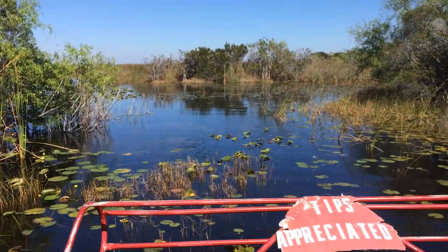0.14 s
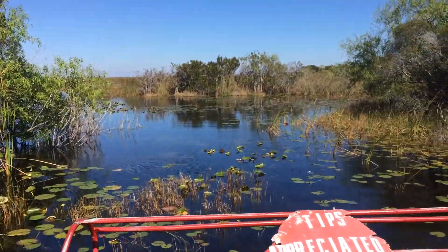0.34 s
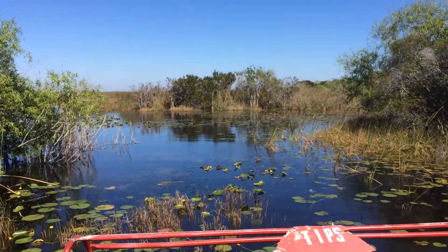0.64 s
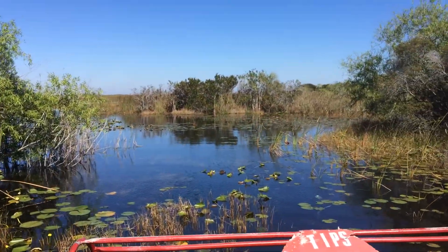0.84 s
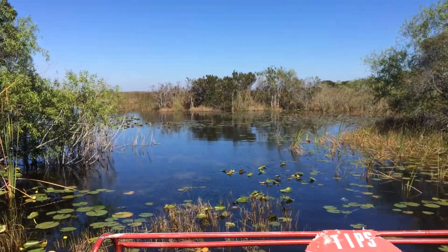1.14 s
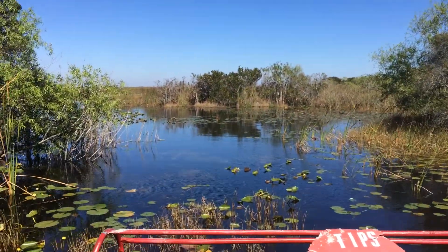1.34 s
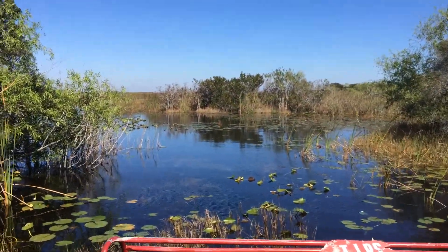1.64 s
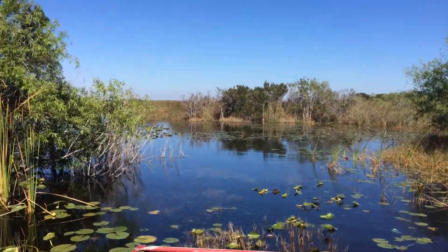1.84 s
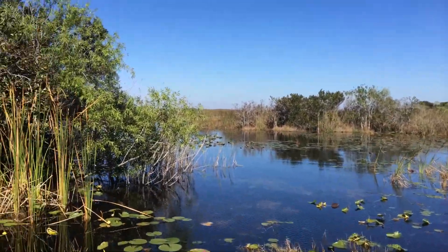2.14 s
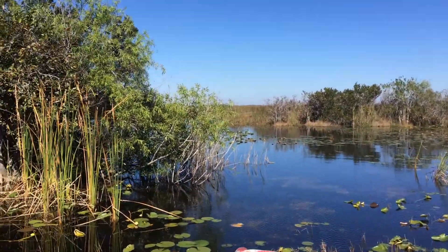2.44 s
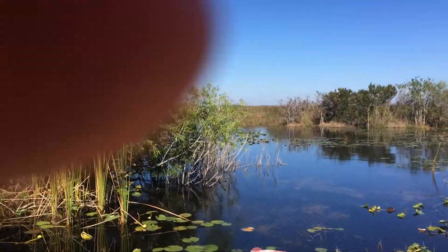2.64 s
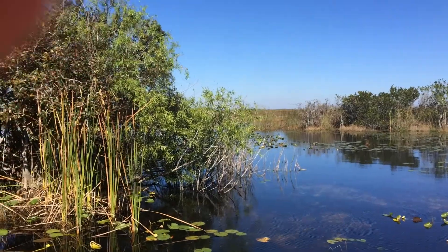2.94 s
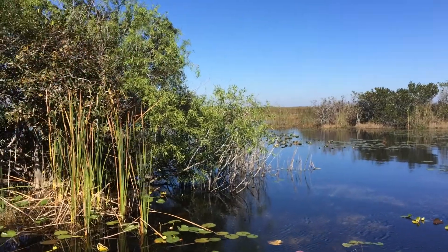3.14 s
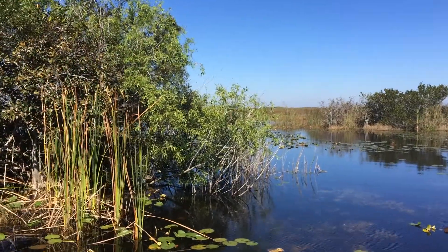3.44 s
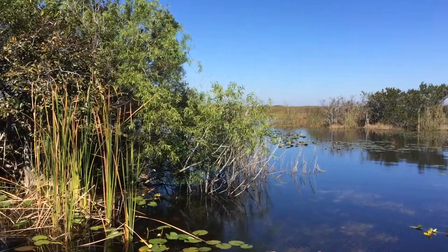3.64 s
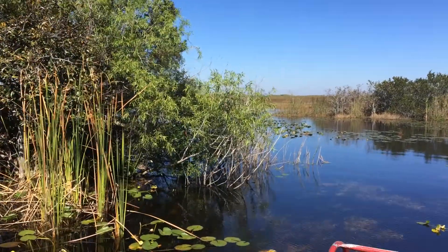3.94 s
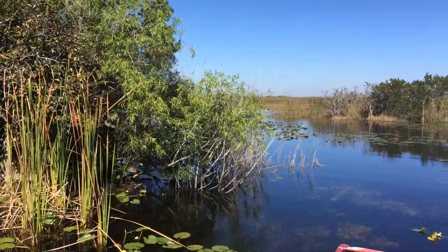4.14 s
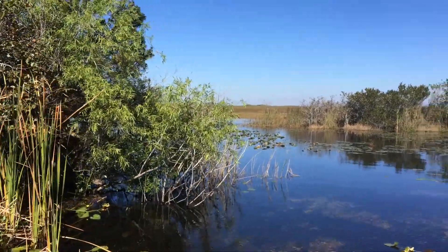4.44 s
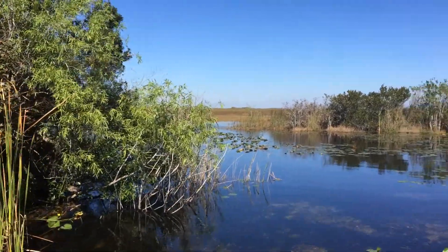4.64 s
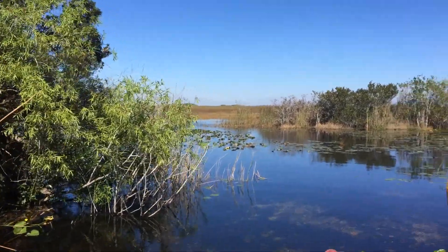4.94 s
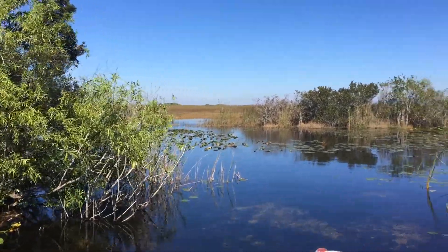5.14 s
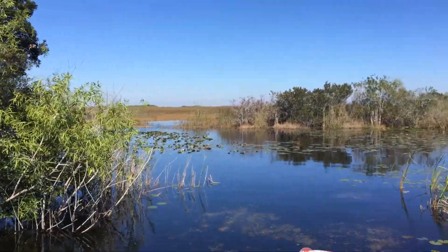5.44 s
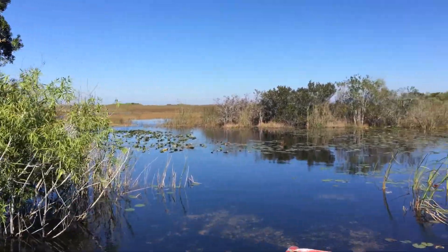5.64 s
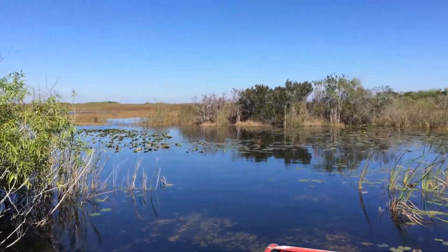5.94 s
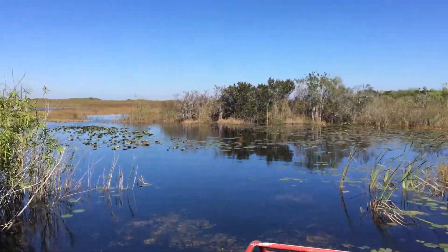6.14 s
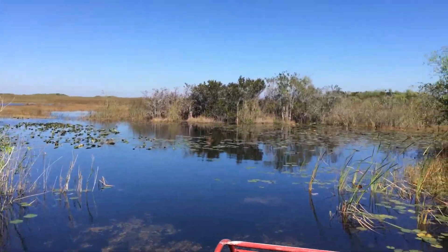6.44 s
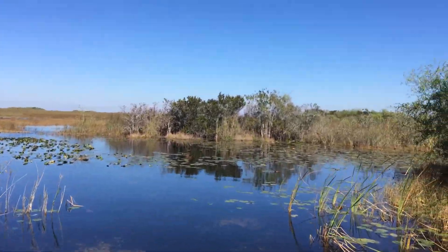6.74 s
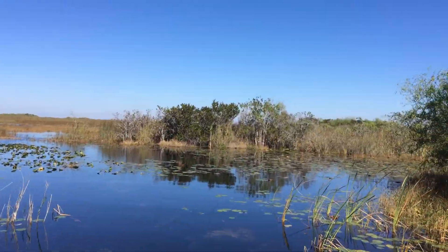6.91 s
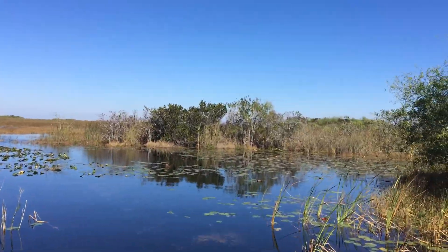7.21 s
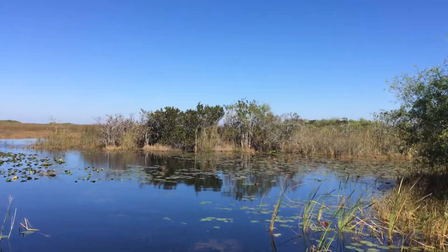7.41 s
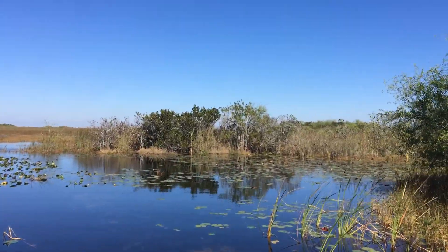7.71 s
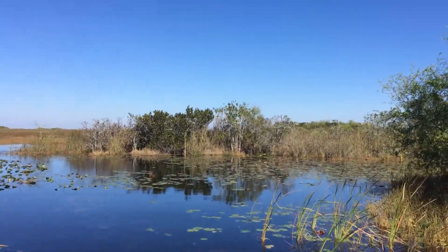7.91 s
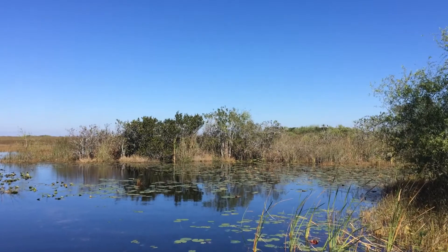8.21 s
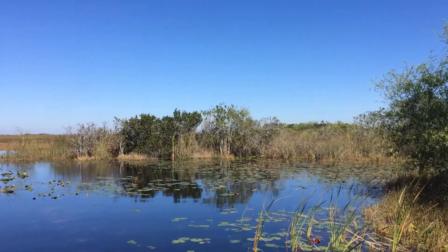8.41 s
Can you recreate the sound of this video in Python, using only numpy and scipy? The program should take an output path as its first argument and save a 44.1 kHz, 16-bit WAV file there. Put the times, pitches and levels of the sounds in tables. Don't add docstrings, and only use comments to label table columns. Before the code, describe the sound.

A big engine and propeller close by, outdoors with no echo. First a lumpy, low idle with clattering metal, almost sagging near one second. Then a quick rev into a strong throbbing roar with hard exhaust pops and rattling buzz, peaking past three seconds. The revs sink by six seconds, then rise slightly, droning on with airy hiss, spray-like swishes and loose knocks. Mono, close, light on sub-bass.

```python
import sys
import numpy as np
from scipy import signal
from scipy.fft import rfft, irfft, next_fast_len
from scipy.io import wavfile
from scipy.ndimage import uniform_filter1d

SR = 44100
rng = np.random.default_rng(int(sys.argv[2]) if len(sys.argv) > 2 else 0)


def elevation(decibels):
    levels = np.asarray(decibels, float)
    return 10 ** (levels / 20)


def dump(signal):
    limited = np.clip(np.atleast_2d(signal).T, -1, 1)
    pcm = np.round(limited * 32767).astype(np.int16)
    wavfile.write(sys.argv[1], SR, pcm)


N = 377937

# t/s, speed/(turns per s)
SHAFT_SPEED = [(0, 15.64), (.48, 16.38), (1.22, 13.71), (2.04, 14.43), (2.36, 20.15), (2.68, 21.8),
               (2.95, 28.0), (3.2, 30.78), (3.4, 31.36), (3.7, 30.24), (4.05, 30.41), (4.6, 27.69),
               (5.95, 21.44), (6.8, 21.76), (7.14, 24.32), (7.48, 24.39), (7.99, 26.12), (8.57, 25.04)]
# t/s, engine load/dB, shaking of the cage/dB
ENGINE_LOAD = [(0, 0, -3), (.55, -2.5, -39), (1.0, -22.5, -2), (1.3, -5.5, -4), (2.0, -19.5, -3),
               (2.25, 3, -14), (2.6, 2.5, 9), (2.85, 4, 15.5), (3.4, 5, 13), (3.8, 5.5, 14.5), (4.5, 4, 6),
               (5.0, 3, 9.5), (5.9, 1, 4.5), (6.5, 0, 6.5), (6.9, 4, 2), (7.4, 2.5, 6), (8.0, 4.5, -5),
               (8.57, 4.5, -1)]
# t/s, change of orders 2 and 4/dB, change of orders 5, 6 and 7/dB
ORDER_SWELLS = [(0, 0.1, 0.1), (2.5, 0.1, 0.1), (2.78, 1.5, 0.1), (3.0, -1.5, 0.6), (3.3, 0.1, 0.6),
                (3.65, -1.5, 3.2), (3.95, -2.2, 1.5), (4.45, 2.8, 2.5), (4.92, 3.2, 0.8), (5.3, -0.6, -2.5),
                (5.8, -0.6, 0.1), (6.2, 2.2, -1.5), (6.5, -0.6, 0.1), (6.9, 2.5, 2.2), (7.2, -1.5, 1.2),
                (7.6, -1.2, 2.2), (8.0, -1.8, 2.5), (8.57, 0.6, 1.5)]

ORDER_LEVELS = [-26.5, -31, -34.5, -36.5]
ORDER_LOAD_SHARE = [0, 1, 1, 1]
ORDER_SURGE = [.42, .3, 0, -.3]
# f/Hz, lift/dB
HULL_LIFT = [(28, -20), (40, -1), (44, 5), (51, 6), (62, 3), (86, -4), (102, 1.8), (122, 3.5), (134, -2),
             (150, 7.5), (185, 7.5)]

FIRING_DIFFERENCE = [-1.5, -8, -4, -4.5]
# f/Hz, level/dB per Hz
RUMBLE_SPECTRUM = [(8.8, -58), (15, -28), (27, -13), (40, 1), (58, -2), (76, -4), (106, -5), (140, -3),
                   (160, -2), (195, -14.5), (313, -33.5), (381, -44), (420, -27), (550, -64), (920, -120)]
# f/Hz, width/Hz, level/dB
PIPE_MODES = [(186, 60, 13), (331.6, 108, 4), (458, 83, -1), (631, 104, -1.5), (1000, 170, -12)]
# t/s, peak level/dB, f/Hz
HARD_POPS = [(2.288, -23, 580), (2.412, -24, 635), (2.969, -24, 536), (3.001, -32, 592), (3.038, -22, 590),
             (3.07, -26, 630), (3.104, -31, 590), (3.172, -32, 554), (3.207, -24, 535), (3.236, -17.5, 540),
             (3.272, -22, 442), (3.3, -27, 604), (3.333, -22, 470), (3.428, -28, 662), (3.465, -28, 730),
             (3.529, -23, 466), (3.593, -33, 614), (3.694, -24, 605), (3.79, -17.5, 600), (3.825, -15, 567),
             (3.889, -24, 530), (3.922, -35, 458), (3.988, -28, 576), (4.121, -36, 565), (4.15, -31, 533),
             (4.221, -23.5, 616), (4.327, -27, 615), (4.467, -24.5, 625), (4.529, -21, 552),
             (4.57, -22, 550), (4.978, -27, 608), (5.054, -24.5, 450)]

# f/Hz, level/dB per Hz
BLADE_HISS = [(180, 2), (300, 3), (403, -10.5), (578, -1.5), (803, -9), (1290, -12.5), (1770, -14),
              (2450, -18.5), (3880, -19), (11300, -28), (15200, -34.5)]
# f/Hz, level/dB per Hz
TIP_HISS = [(6000, -27), (9500, -3), (12000, 0.5), (15200, -3)]

# f/Hz, width/Hz, level/dB
CAGE_MODES = [(1180, 47, 13.5), (1480, 80, 11.5), (1654, 31, 13.5), (1790, 44, 16.5), (2476, 230, 0.5),
              (3140, 64, -20), (3340, 91, 1.5), (3960, 65, 6), (4220, 140, -4), (4870, 160, 1),
              (5560, 79, -28)]
# f/Hz, level/dB per Hz
CLASH_SPECTRUM = [(470, 2.5), (800, 9), (1180, -30), (1440, 11.5), (1690, -37), (1930, 7.5), (2270, -0.5),
                  (2530, -0.5), (3160, -0.5), (4290, -2.5), (7000, -7.5), (15000, -28)]
# t/s, peak level/dB, low ring f/Hz, high ring f/Hz, high ring level over the peak/dB
KNOCKS_AT_IDLE = [(0.119, -30.5, 1000, 4100, 5), (0.2973, -32, 1360, 3150, -18),
                  (0.6205, -23.5, 1520, 3400, 0), (0.7243, -29.5, 1310, 3880, 5),
                  (0.7945, -22.5, 1480, 4240, -13), (0.865, -29, 1770, 4870, 4),
                  (0.9043, -25.5, 1000, 3230, -2), (1.0518, -31, 1560, 3100, 0),
                  (1.2154, -24, 1880, 3870, -14), (1.2506, -21, 2520, 2990, 0),
                  (1.291, -37.5, 1800, 4500, 16), (1.3633, -29, 1950, 3090, -8),
                  (1.473, -30, 1780, 3860, 10), (1.508, -23, 1190, 4400, -3),
                  (1.6123, -19.5, 2540, 3330, -2), (1.802, -24, 2500, 4030, 7.5),
                  (1.8386, -23.5, 1650, 3780, -4), (1.9612, -30.5, 1830, 2920, -11),
                  (2.1528, -22.5, 1225, 2980, -24), (2.2215, -27.5, 1290, 4630, 11),
                  (2.2552, -23.5, 1790, 2960, 0), (2.2842, -18.5, 1180, 3580, -13),
                  (2.363, -21, 2395, 4380, 4), (2.4173, -28.5, 2640, 4540, 12),
                  (2.5153, -23.5, 1200, 2990, -18), (2.5634, -22.5, 1700, 4350, 2),
                  (2.7013, -28.5, 1130, 3640, 1), (2.7275, -23.5, 1860, 4470, -10),
                  (2.7447, -23.5, 1720, 4080, 0), (2.8032, -25, 1180, 3640, -14),
                  (2.8434, -25, 1200, 2970, -23), (2.8997, -25, 1000, 3540, -6)]
KNOCKS_UNDER_WAY = [(3.2574, -26.5, 1050, 3360, -8), (3.7404, -30, 1160, 3630, -8),
                    (3.825, -41, 1160, 4070, -4), (4.0894, -33, 1540, 3530, -4),
                    (4.4097, -32, 1000, 4220, 3), (4.8833, -28.5, 1790, 3440, -14),
                    (4.998, -29, 1100, 4360, 0), (5.2604, -41, 1780, 3130, -12),
                    (5.4262, -30, 1720, 3950, -11), (5.6222, -27, 1510, 3380, -15),
                    (5.7711, -29, 2610, 3640, 10.5), (6.0235, -29, 1480, 4400, 9),
                    (6.139, -23.5, 1740, 4220, 3), (6.3228, -29, 1670, 4340, 7),
                    (6.5837, -31, 1530, 4150, 7), (6.61, -41, 1630, 3470, -9),
                    (6.6812, -42, 1790, 3120, -4), (6.7052, -24.5, 1630, 3140, -9),
                    (6.7516, -30, 1810, 3760, 4), (6.818, -24.5, 1820, 3740, -16),
                    (6.8674, -48, 1700, 3270, -10), (6.8887, -28, 1790, 3810, -15),
                    (7.3215, -27, 1480, 3570, -8), (7.3798, -26.5, 1020, 3840, 4),
                    (7.765, -36, 1210, 3770, 5), (7.865, -33, 1400, 3810, 1), (7.9807, -29, 1050, 3530, -5),
                    (8.1723, -29, 1280, 3620, 6), (8.328, -28, 1130, 4090, 3)]
# t/s, peak level/dB, low ring f/Hz, high ring level over the peak/dB
LIGHT_TICKS = [(0.365, -38, 1550, -19), (0.4206, -45.5, 1080, 8), (0.487, -46.5, 1020, -1),
               (1.1305, -40.5, 1480, 0), (1.175, -44, 1810, 8), (2.079, -41, 1920, 4),
               (2.1894, -43.5, 1050, 14), (2.3088, -31.5, 1160, 1), (2.448, -32.5, 1120, -6),
               (2.613, -40, 1830, 3), (2.6564, -39.5, 1840, 5), (3.13, -42, 1180, -24),
               (3.3923, -43, 1160, -25), (4.3584, -54, 1060, -11), (4.5936, -40, 1120, -20),
               (5.66, -42.5, 1620, 10), (6.39, -39.5, 1660, -16), (6.66, -43, 1070, 1),
               (7.0543, -42, 1590, 9), (7.1089, -44, 1070, 1), (7.2367, -42, 1400, 2),
               (7.417, -44, 1040, 6), (7.7272, -36.5, 1180, 3), (8.3878, -49, 1350, 4)]
MISSED_BEATS = [112, 132, 144, 156, 160, 180, 184, 188]
# t/s, peak level/dB, f/Hz
CAGE_RINGS = [(0.125, -46, 3768), (0.129, -45, 2842), (0.302, -46, 1442), (0.396, -47, 2454),
              (0.398, -46, 1528), (0.402, -49, 2971), (0.428, -47, 3488), (0.631, -46, 2476),
              (0.66, -41, 1507), (0.73, -43, 2476), (0.803, -46, 5060), (0.804, -47, 2497),
              (0.904, -37, 818), (0.907, -41, 2217), (0.908, -44, 4263), (0.908, -42, 3165),
              (0.91, -41, 2842), (0.911, -43, 3380), (1.257, -40, 4198), (1.258, -36, 1485),
              (1.476, -46, 5017), (1.509, -46, 4371), (1.511, -36, 2562), (1.515, -42, 4026),
              (1.519, -36, 1787), (1.617, -39, 4715), (1.657, -44, 1313), (1.66, -41, 3057),
              (1.804, -40, 1421), (1.805, -40, 3832), (1.805, -39, 4242), (1.808, -45, 4952),
              (1.811, -42, 2842), (1.962, -47, 4543), (2.159, -38, 1636), (2.232, -41, 3057),
              (2.289, -42, 2670), (2.312, -35, 1464), (2.368, -38, 3639), (2.368, -35, 3983),
              (2.37, -35, 4672), (2.389, -39, 1636), (2.445, -42, 3596), (2.447, -39, 4672),
              (2.448, -39, 2691), (2.453, -38, 1162), (2.618, -38, 1830), (2.731, -35, 1808),
              (2.75, -40, 2670), (2.752, -40, 3509), (2.753, -41, 5103), (2.756, -43, 4629),
              (2.904, -44, 2670), (2.921, -37, 2304),
              (3.14, -37, 1153), (3.183, -42, 4198), (3.399, -31.5, 1160), (3.699, -40.5, 3600),
                   (3.757, -36, 1410), (3.795, -41, 1350), (3.923, -45, 3500), (4.226, -36.5, 1080),
                   (4.241, -38, 1850), (4.599, -36, 1150), (4.644, -43, 4560), (4.644, -40, 3983),
                   (4.889, -38, 1787), (4.944, -41, 2360), (5.267, -37, 1804), (5.445, -44, 2347),
                   (5.449, -39, 1130), (5.621, -44, 2497), (5.626, -37, 1386), (5.692, -43, 1686),
                   (6.01, -45, 1820), (6.03, -49, 4823), (6.326, -45, 3500), (6.329, -45, 3165),
                   (6.329, -43, 2648), (6.393, -46, 4198), (6.589, -49, 4030), (6.612, -39, 1670),
                   (6.689, -41, 1787), (6.711, -37, 3186), (6.832, -43, 2550), (6.904, -39, 1787),
                   (7.056, -44, 4392), (7.329, -39, 1464), (7.571, -44, 1750), (7.709, -41, 4091),
                   (7.71, -41, 3740), (7.737, -46, 4844), (7.769, -42, 2550), (7.867, -43, 3789),
                   (7.87, -43, 1440), (8.178, -44, 4500), (8.331, -45, 4069), (8.393, -43, 4070),
                   (8.49, -44, 1421), (8.507, -43, 2454),
              (1.52, -40, 952), (2.085, -37.5, 630), (2.47, -39, 1804), (2.52, -42, 2340),
              (2.575, -33, 1684), (2.854, -34, 1710), (2.861, -35, 1190), (6.76, -46, 1640),
              (6.72, -38, 1790), (6.83, -38, 1800), (6.85, -40, 1650), (6.87, -38, 1790),
              (6.935, -42, 1800)]

# f/Hz, level/dB per Hz
DEBRIS_HISS = [(2500, -32), (5000, 3.5), (7000, 7), (11000, -4), (15200, -25)]
# t/s, level/dB
SPRAY_SWELLS = [(.8, 0.5), (1.1, 0.5), (2.0, 1), (2.7, -4), (3.75, -2), (3.87, 1), (4.35, -1), (4.6, -2),
                (5.25, -3), (5.45, 0), (5.56, -2.2), (5.9, -1), (6.06, 2.2), (6.2, 2.5), (6.36, -1.5),
                (6.55, -3.5), (6.92, 0), (7.12, 3), (7.66, 3.5), (8.03, 3.5), (8.37, 2.5), (8.5, -1)]


def evened(x):
    return x / np.sqrt(np.mean(x ** 2) + 1e-20)


def noise_of(length=N):
    return rng.standard_normal(length)


def columns(rows):
    s, *values = np.transpose(rows)
    return [np.interp(np.arange(N) / SR, s, v) for v in values]


def coloured(x, spectrum):
    hz, db = np.transpose(spectrum)
    size = next_fast_len(len(x))
    log_f = np.log(np.fft.rfftfreq(size, 1 / SR) + 1)
    shape_db = np.interp(log_f, np.log(hz + 1), db, -100, -100)
    return evened(irfft(rfft(x, size) * elevation(shape_db), size)[:len(x)])


def resonate(x, hz, width):
    r = np.exp(-np.pi * width / SR)
    return 2 * signal.lfilter([1 - r], [1, -r * np.exp(2j * np.pi * hz / SR)], x).real


def body(x, modes):
    out = 0
    for k, (hz, width, db) in enumerate(modes):
        out = out + (-1) ** k * elevation(db) * resonate(x, hz, width)
    return evened(out)


def steady(x, seconds):
    return x / np.sqrt(uniform_filter1d(x ** 2, round(seconds * SR)) + 1e-12)


def beats(turns, spread_db, count):
    number = np.floor(turns * count).astype(int)
    strength = elevation(spread_db * noise_of())[number]
    return strength * (np.diff(number, prepend=0) > 0), number


def puffed(clicks, seconds):
    return signal.lfilter([1], [1, -np.exp(-1 / (seconds * SR))], clicks)


def order_levels(speed, load_db):
    hz, lift_db = np.transpose(HULL_LIFT)
    gaining = uniform_filter1d(np.gradient(speed) * SR, SR // 3)
    gaining = np.roll(gaining, round(0.05 * SR))
    gaining = gaining * np.clip((speed - 21) / 3, 0, 1)
    low_swell_db, high_swell_db = columns(ORDER_SWELLS)
    levels_db = []
    for k, db, share, surge_db in zip((2, 4, 5, 6), ORDER_LEVELS, ORDER_LOAD_SHARE, ORDER_SURGE):
        pull_db = low_swell_db if k < 5 else high_swell_db
        hull_db = np.interp(np.log(k * speed), np.log(hz), lift_db)
        levels_db.append(db + pull_db + share * load_db + surge_db * gaining + hull_db)
    return levels_db


def waver():
    return evened(resonate(resonate(noise_of(), 0, 9.0), 0, 9.0))


def orders(turns, speed, load_db):
    second_db, fourth_db, fifth_db, sixth_db = order_levels(speed, load_db)
    first_db = -33.0 - 1.2 * np.maximum(24 - speed, 0)
    third_db = -29.0 - 0.55 * (speed - 14)
    fifth_db = fifth_db - .55 * np.clip(141 - 5 * speed, 0, 20)
    seventh_db = -31.5 + load_db + 1.5 * columns(ORDER_SWELLS)[1] - .3 * abs(7 * speed - 175)
    seventh_db = np.maximum(seventh_db, -41.0)
    levels = {2: second_db, 4: fourth_db, 6: sixth_db, 5: fifth_db, 7: seventh_db, 3: third_db, 1: first_db}
    gust, out = waver(), np.zeros(N)
    for k, db in levels.items():
        strength = 1 + .21 * (.8 * waver() + .6 * gust)
        slip = .33 * (1.7 if k > 4 else 1) * waver()
        offset = (k % 2) * rng.random()
        tone = strength * np.cos(2 * np.pi * k * (turns + offset) + slip)
        out -= np.sqrt(2) * elevation(db - .2 * k) * tone
    return out


def exhaust(turns, load_db):
    clicks, number = beats(turns, 3.0, count=4)
    cylinders = len(FIRING_DIFFERENCE)
    swap = (-1.) ** (number // cylinders)
    firings = coloured(clicks * swap * elevation(FIRING_DIFFERENCE)[number % cylinders], RUMBLE_SPECTRUM)
    turbulence = coloured(noise_of(), RUMBLE_SPECTRUM)
    rumble = steady(0.36 * firings + 0.99 * turbulence, 0.17)
    boom = resonate(resonate(firings + turbulence, 153.4, 69.0), 153.4, 69.0)
    return elevation(-23 + 0.06 * load_db) * rumble + elevation(-36.5 + 0.9 * load_db) * steady(boom, 0.28)


def pops(turns, speed, load_db):
    clicks, number = beats(turns, 2.2, count=2)
    clicks = clicks * elevation(-9.0 * (number % 2))
    slap = np.clip(2.1 - .07 * speed, .55, 1.1) * evened(resonate(clicks, 0, 900.0))
    breath = evened((puffed(clicks, .009) + .27) * noise_of())
    pop = steady(body(slap + breath, PIPE_MODES[2:]), 0.19)
    strong = clicks * (number % 2 == 0)
    clean = np.clip(2.9 - .1 * speed, .4, 1.5)
    blur = np.clip(.025 * (speed - 14), .04, .3)
    chug = clean * evened(strong) + evened((puffed(strong, .011) + blur) * noise_of())
    thud = steady(body(resonate(chug, 260.0, 250.0), PIPE_MODES[:2]), 0.216)
    return elevation(-49.5 + 2.17 * load_db) * pop + elevation(-36 + 0.95 * load_db) * thud


def hard_pops():
    out, t = np.zeros(N), np.arange(1500) / SR
    shape = np.minimum(t / 0.0031, 1) * np.exp(-t / 0.0072)
    for s, db, hz in HARD_POPS:
        out[round(s * SR):][:len(t)] += elevation(db + 2.0) * np.sin(2 * np.pi * hz * t) * shape
    return out


def blades(turns, level_db):
    clicks, number = beats(turns, 3.0, count=2)
    chop = 1 + 0.41 * puffed(clicks * elevation(-3.0 * (number % 2)), 0.014)
    return elevation(level_db + 11.0) * steady(coloured(chop * noise_of(), BLADE_HISS), 0.06)


def rattles(speed, rows):
    out, t = np.zeros(N + 9000), np.arange(9000) / SR
    burst = np.minimum(t / .007, 1) ** 1.5 * elevation(-60 * np.maximum(t - .012, 0) / 0.11)
    for s, db, low_hz, high_hz, high_db in rows:
        grain = elevation(0.95 * evened(resonate(noise_of(len(t)), 0, 220.0)))
        noise = noise_of(len(t)) * grain
        parts = [(hz * rng.uniform(.98, 1.02), width, part_db + 4.5 * rng.standard_normal())
                 for hz, width, part_db in CAGE_MODES]
        low = evened(resonate(noise, low_hz, 50.0))
        high = evened(resonate(noise, high_hz, 500.0)) * elevation(high_db)
        clash = evened(puffed(coloured(noise, CLASH_SPECTRUM), .00003))
        knock = 0.34 * low + 0.23 * high + 0.49 * clash + 0.32 * body(noise, parts)
        at = round((s - .004) * SR)
        half_turn = round(SR / speed[at] / 2)
        rebounds = elevation(-19.0) * np.roll(burst, half_turn) + elevation(-16.0) * np.roll(burst, 2 * half_turn)
        out[at:at + len(t)] += elevation(db - 3.5) * (burst + rebounds) * knock
    return out[:N]


def beat_knocks(turns, speed):
    hits = np.setdiff1d(np.arange(52, turns[-1], 4), MISSED_BEATS)
    at = np.searchsorted(turns, hits + .13)
    chance = rng.standard_normal((len(at), 3))
    level_db = -35.5 + 4 * chance[:, 0]
    low_hz = 1400 * (1 + 0.234 * chance[:, 1])
    high_hz = 4000 * (1 + .06 * chance[:, 2])
    return list(zip(at / SR, level_db, low_hz, high_hz, 2.0 - (speed[at] - 25)))


def knock_rows(turns, speed):
    rows = [(s, db - 4, *ring) for s, db, *ring in KNOCKS_AT_IDLE]
    rows += [(s, db - 5, *ring) for s, db, *ring in KNOCKS_UNDER_WAY]
    rows += [(s, db + 4.5, hz, 4000 * rng.uniform(0.76, 1.18), high_db) for s, db, hz, high_db in LIGHT_TICKS]
    return rows + beat_knocks(turns, speed)


def rings(rows):
    out, t = np.zeros(N + 4000), np.arange(4000) / SR
    rise_s, t60_s = .008, 0.08
    shape = np.minimum(t / rise_s, 1) ** 2 * elevation(-60 * np.maximum(t - rise_s, 0) / t60_s)
    for s, db, hz in rows:
        unsteady = 1 + np.sqrt(hz / 14000) * evened(resonate(noise_of(len(t)), 0, hz / 14))
        at = round((s - rise_s - .004) * SR)
        out[at:at + len(t)] += elevation(db + 2) * shape * unsteady * np.sin(2 * np.pi * hz * t)
    return out[:N]


def trembling(knocks):
    power = abs(uniform_filter1d(knocks ** 2, round(0.1 * SR)))
    return 10 * np.log10(1 + power / elevation(-56) ** 2)


def buzz(turns, level_db):
    clicks = beats(turns, 3.5, count=2)[0]
    swell = elevation(5.0 * evened(resonate(noise_of(), 0, 36.0)))
    chatter = (puffed(clicks, 0.029) + 0.89) * swell * noise_of()
    return elevation(level_db - 19.0) * steady(body(chatter, CAGE_MODES), 0.067)


def spray_swells():
    t = np.arange(0, N, 64) / SR
    swell_db = sum(db * np.exp(-.5 * ((t - s) / 0.053) ** 2) for s, db in SPRAY_SWELLS)
    return uniform_filter1d(swell_db.repeat(64)[:N], size=64)


def swish(level_db):
    return elevation(np.roll(level_db, round(0.037 * SR))) * coloured(noise_of(), DEBRIS_HISS)


def tips(speed):
    return elevation(-63 + 1.3 * (speed - 28)) * coloured(noise_of(), TIP_HISS)


def scene():
    speed, (load_db, shake_db) = columns(SHAFT_SPEED)[0], columns(ENGINE_LOAD)
    turns = .2 + np.cumsum(speed) / SR
    engine = orders(turns, speed, load_db) + exhaust(turns, load_db)
    engine += pops(turns, speed, load_db) + hard_pops()
    knocks = rattles(speed, knock_rows(turns, speed))
    knocks += rings(CAGE_RINGS)
    jolt_db, swell_db = trembling(knocks), spray_swells()
    hiss_db = -53 + 0.36 * load_db + 0.12 * shake_db + 0.18 * jolt_db + 0.87 * swell_db
    buzz_db = -40.5 + shake_db + 0.091 * jolt_db
    swish_db = -73 + 1.19 * np.minimum(jolt_db, 14.0) + 0.12 * load_db + 3.2 * swell_db
    cage = knocks + buzz(turns, buzz_db)
    mix = engine + blades(turns, hiss_db) + cage + swish(swish_db) + tips(speed)
    return mix[None]


def band_limit(x):
    return signal.sosfilt(signal.butter(12, 15310, fs=SR, output="sos"), x)


def record(dry):
    size = next_fast_len(N + SR)
    f = np.fft.rfftfreq(size, 1 / SR) + 1
    bass = np.hypot(1 / np.sqrt(1 + (40.5 / f) ** 10), .155)
    cut = irfft(rfft(dry, size) * bass, size)[:, :N]
    edge = signal.firwin(511, 15420, window=("kaiser", 9), fs=SR)
    return band_limit(signal.oaconvolve(cut, edge[None], "same"))


dry = scene()
out = record(dry)
dump(out)
```